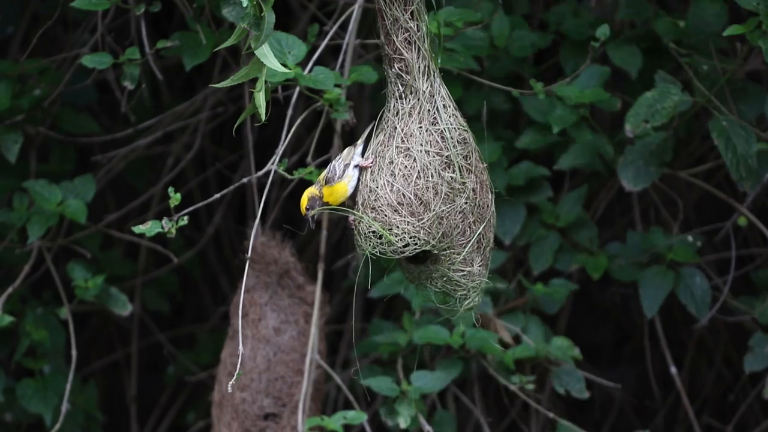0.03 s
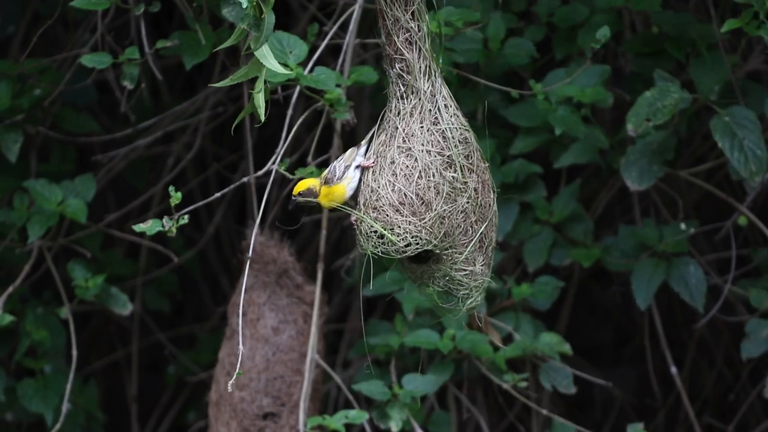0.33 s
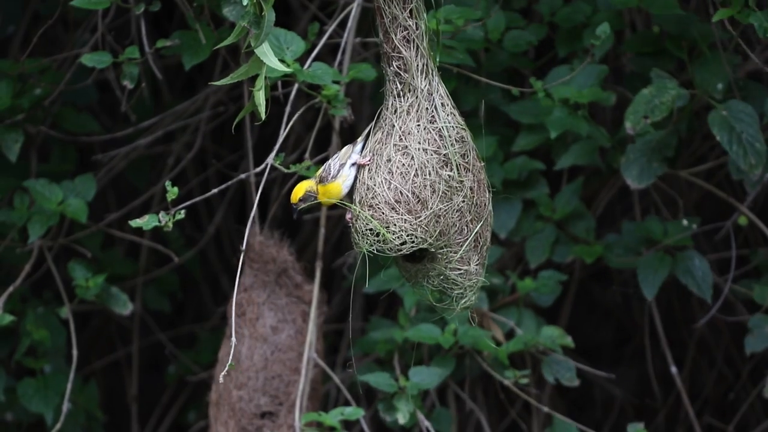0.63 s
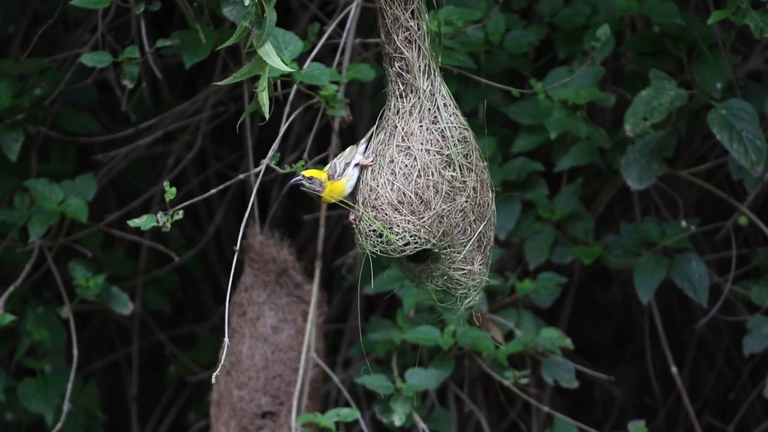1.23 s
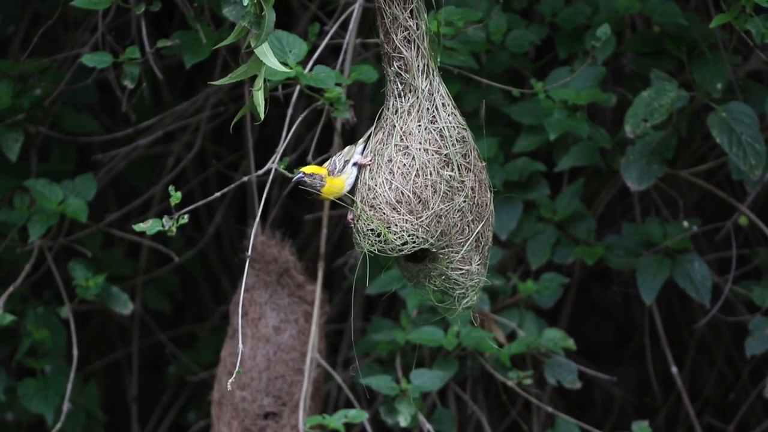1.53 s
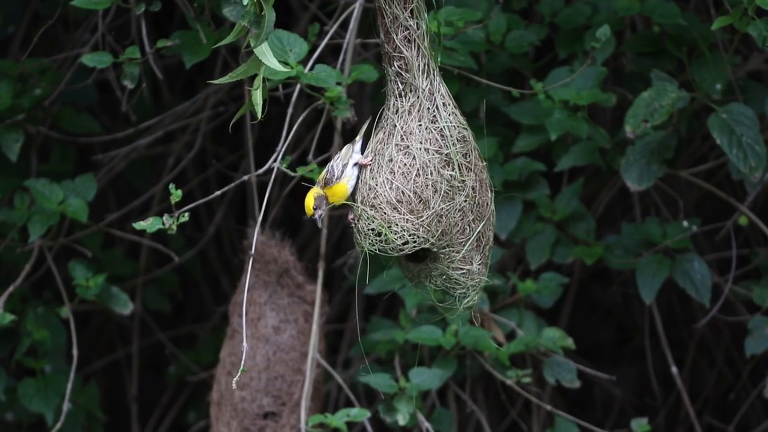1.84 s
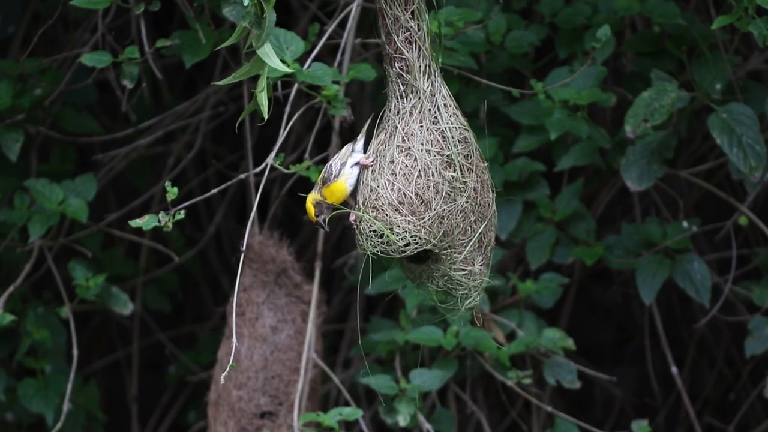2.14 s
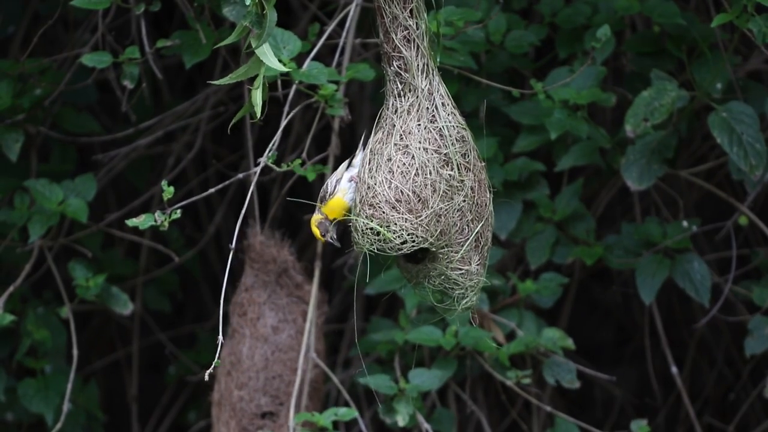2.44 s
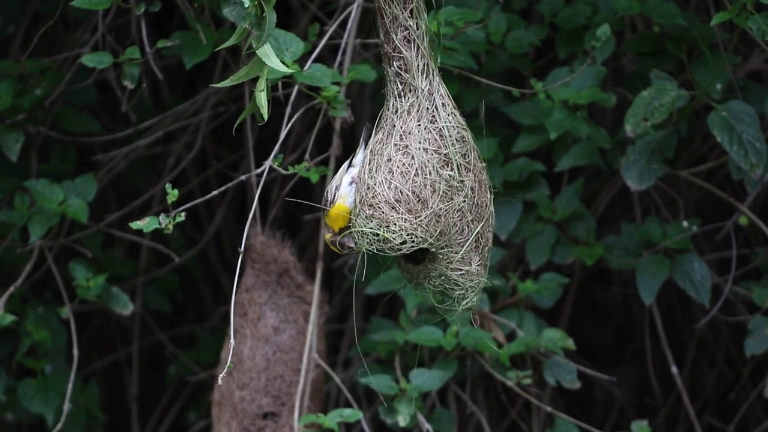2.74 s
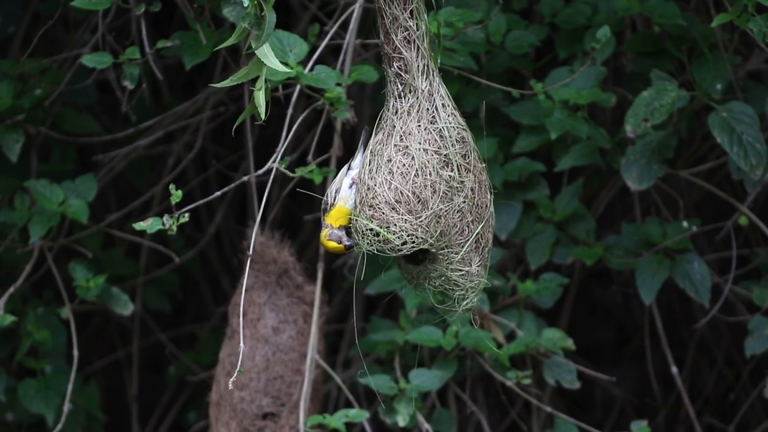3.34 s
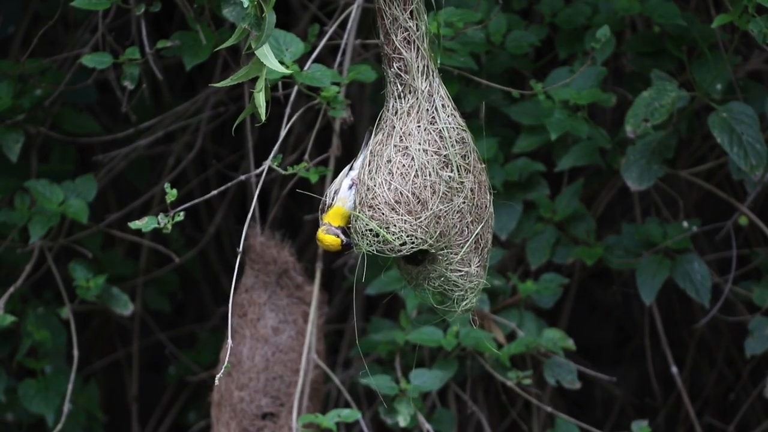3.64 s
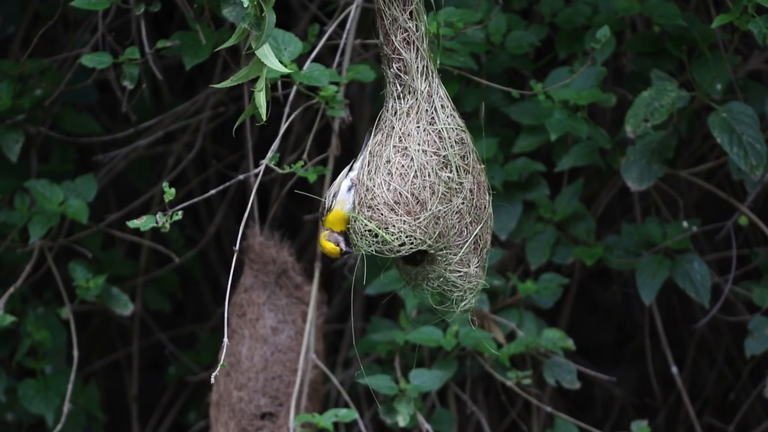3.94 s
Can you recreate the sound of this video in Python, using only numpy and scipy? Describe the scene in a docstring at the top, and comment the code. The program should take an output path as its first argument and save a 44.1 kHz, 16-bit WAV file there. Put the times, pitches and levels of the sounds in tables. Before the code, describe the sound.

Small birds chirp and chatter in short calls over faint hiss and light wind.

```python
"""Weaver birds at a nesting colony in dense shrubs, in mono, over a steady outdoor hiss.
First one bird runs off rough chirps, two-voiced from its syrinx, while a gust buffets the microphone.
Others add falling slurs, thin whistles, then buzzes and rasps. Midway the chirps end and three sharp
clacks ring. A farther bird then gives four zigzag calls, the last in a second gust.
Foliage scatters every call."""
import sys
import numpy as np
from scipy import signal
from scipy.fft import rfft, irfft
from scipy.io import wavfile

SR = 44100
rng = np.random.default_rng(int(sys.argv[2]) if len(sys.argv) > 2 else 0)


def master(y):
    """Save y as 16-bit WAV."""
    cut = np.clip(np.atleast_2d(y).T, -1, 1)
    pcm = np.round(cut * 32767)  # scale
    wavfile.write(sys.argv[1], SR, pcm.astype(np.int16))


N = 176400
TIME = np.arange(N) / SR

# outdoor hiss spectrum: freq_hz, gain_db
AIR_SPECTRUM = [(20, -18), (60, -5), (120, -0.5), (200, -0.5), (330, -3), (480, -3), (680, -7),
                (1200, -8.5), (2700, -10), (4000, -13.5), (5500, -15.5), (8500, -14.5), (12500, -22.5),
                (16000, -36)]
# outdoor hiss envelope: time_s, level_db
AIR_ENVELOPE = [(.04, -35), (1, -37), (1.7, -37), (2.5, -36), (3.1, -36.5), (3.45, -36.5), (4, -38)]
# envelope of its treble: time_s, gain_db
TREBLE_ENVELOPE = [(.04, 0), (.22, -1), (.9, 1.5), (1.35, 3), (1.55, -1), (1.75, -2), (2.05, 2),
                   (2.2, -1.5), (2.55, 1.5), (2.85, -0.5), (3.3, 0), (3.5, -4.5), (3.7, -0.5), (4, -1)]
# wind rumble spectrum: freq_hz, gain_db
WIND_SPECTRUM = [(20, -18), (50, -3.5), (100, -2), (200, -7), (400, -14), (1200, -39)]
# wind rumble envelope: time_s, level_db
WIND_ENVELOPE = [(0, -54), (.35, -42), (.7, -36), (.92, -45), (1.03, -37.5), (1.35, -52.5), (2.3, -45),
                 (3.35, -55), (3.54, -37.5), (3.7, -43), (3.8, -30.5), (4, -37.5)]
# eddies on the microphone: centre_s, pitch_hz, peak_db
BUFFETS = [(.4, 105, -26.5), (.478, 113, -25), (0.534, 107, -21), (.625, 94, -25), (0.655, 113, -19),
           (0.721, 75.6, -22), (.805, 90, -21), (.828, 148, -28), (3.78, 95, -21), (3.808, 100, -44),
           (3.83, 135, -26), (3.859, 128, -23.5), (3.928, 108, -23), (3.964, 170, -22.5),
           (3.981, 107, -22.5)]
# reflections off near branches: delay_s, gain_db
TWIG_ECHOES = [(.007, -18.5), (.013, -19.5), (.022, -22.5)]
# twig and bill ticks: start_s, level_db
TICKS = [(0.189, -18), (.256, -17), (.761, -32), (.776, -19), (1.155, -22), (1.574, -35), (1.841, -24),
         (2.8, -17), (3.641, -23)]
# woody knocks: start_s, level_db
CLACKS = [(1.858, -13), (1.8731, -14), (1.909, -11)]
# resonances of a knock: freq_hz, gain_db, t60_s
CLACK_MODES = [(1180, -6, 0.0027), (1500, -1, 0.013), (1690, -3, 0.0053), (2420, -1, 0.0053),
               (5130, 1.5, 0.0017)]
# rasps: start_s, length_s, centre_hz, width_hz, level_db
RASPS = [(1.153, 0.064, 6250, 1300, -40.5), (1.201, 0.0088, 2190, 500, -32.5),
         (1.84, 0.075, 7160, 2200, -38), (1.919, 0.099, 4000, 1700, -32.5), (1.93, 0.072, 1455, 260, -37),
         (2.141, 0.081, 2200, 900, -43), (2.438, 0.095, 5700, 1600, -45), (2.472, 0.13, 3050, 900, -42),
         (2.748, 0.09, 7100, 2970, -39), (2.843, 0.029, 4100, 800, -37), (2.85, 0.018, 1140, 300, -37.5),
         (3.112, 0.042, 7500, 4500, -43.5), (3.531, 0.083, 1670, 1100, -47.5),
         (3.574, 0.054, 8300, 2200, -46), (3.68, 0.066, 7200, 3720, -41)]
# buzzy trills: start_s, length_s, centre_hz, sweep_hz, sweeps_per_s, level_db
BUZZES = [(1.029, 0.062, 2012, 630, 130, -33.5), (2.409, 0.051, 3320, 1460, 110, -30),
          (3.486, 0.042, 2150, 900, 110, -45), (3.581, 0.038, 2450, 700, 113, -40)]
# whistles: start_s, length_s, first_hz, last_hz, level_db
WHISTLES = [(0.224, 0.01, 3250, 3160, -35), (0.649, 0.037, 1930, 1845, -42.5),
            (.903, 0.024, 2950, 2780, -38), (0.923, 0.039, 2777, 2752, -33.5),
            (1.115, .04, 2880, 2760, -39), (2.199, 0.023, 2950, 2850, -43), (2.224, 0.069, 2480, 2210, -40),
            (2.979, 0.054, 2760, 2742, -36), (3.556, 0.041, 1760, 1695, -45)]
# falling slurs: start_s, length_s, top_hz, end_hz, level_db
SLURS = [(0.092, 0.039, 4240, 3550, -38.5), (0.294, 0.033, 3000, 1930, -38),
         (0.475, 0.013, 4250, 3680, -29), (0.557, .018, 3140, 2330, -38), (0.64, 0.04, 3930, 3050, -37.5),
         (0.682, 0.048, 2550, 1930, -41.5), (0.808, .016, 3900, 3000, -34),
         (0.971, .042, 2800, 1823, -33.5), (1.282, 0.059, 2980, 1723, -36.5),
         (1.673, 0.051, 3045, 1680, -36), (1.938, .062, 3950, 2913, -29),
         (1.962, 0.0274, 2754, 2090, -31.5), (2.536, 0.0253, 2540, 1890, -37),
         (2.832, .054, 3250, 1927, -34), (2.93, 0.015, 4500, 3700, -39.5),
         (2.941, 0.043, 3360, 2860, -38.5), (3.027, 0.025, 2896, 2300, -38)]
# zigzag calls: start_s, pitch_ratio, level_db
ZIGZAGS = [(2.291, 1.0, -34.5), (2.816, 1.01, -35.5), (3.27, 0.97, -33.5), (3.844, 1.01, -31)]
# contour of one zigzag: time_s, pitch_hz, gain_db, roughness
ZIGZAG_CONTOUR = [(0, 4640, 1, 0.06), (.005, 5896, -2, 0.1), (.011, 5014, -4, 0.06),
                  (.016, 3915, -3.5, 0.18), (.025, 4186, 1.5, 0.25), (.03, 5150, -5, 0.17),
                  (.036, 4802, -10, 1.02), (.046, 3950, -2, 1), (.058, 4300, -7.5, 1)]
# chatter chirps: start_s, length_s, level_db, hiss_gain_db, roughness, pitch_ratio
CHIRPS = [(0.046, 0.082, -38, 2, 0.97, 1.13), (0.24, 0.066, -25, -8, 0.52, 1.03),
          (0.404, .08, -29, -6.5, 0.53, 1.05), (0.561, 0.077, -30.5, -7, 0.7, 1.02),
          (0.745, 0.093, -32.5, 1, 0.88, 0.96), (.893, 0.091, -32.5, -3.5, .7, 0.94),
          (1.05, 0.09, -32, -5.5, 0.5, 0.98), (1.231, 0.075, -31, -5, 0.7, .99),
          (1.416, .084, -37, -0.5, 0.44, .98), (1.59, 0.085, -36, -8.5, 0.36, .98),
          (1.773, 0.096, -39, -2, 0.34, 0.94)]
# the two sides of the syrinx in a chirp: length_share, pitch_hz, gain_db
LEADING_VOICE = [(0, 4400, -6), (.06, 4850, -3.5), (.13, 4700, -3.5), (.22, 3950, -4.5), (.42, 3300, -3),
                 (.65, 2850, -7.5), (1, 2650, -5)]
TRAILING_VOICE = [(0.152, 4400, 1), (0.212, 5050, -7), (0.278, 4700, -4.5), (.48, 4600, 0), (.68, 4100, -2),
                  (.88, 3880, -4.5), (1, 3300, 0.5)]
# chirp hiss spectrum: freq_hz, gain_db
CHIRP_HISS_SPECTRUM = [(1500, -47), (2700, 5.5), (4600, -4), (5500, -4.5), (6400, 2), (8200, 0),
                       (10000, -11.5), (12500, -11), (16000, -43)]


def from_db(db):
    """Decibels to gain."""
    return 10 ** (np.asarray(db) / 20)


def rms_one(x):
    """Scale to unit rms."""
    return x / np.sqrt(np.mean(x ** 2) + 1e-20)


def add(out, start_s, x):
    """Mix x in at start_s."""
    i = max(int(start_s * SR), 0)
    out[i:i + len(x)] += x[:max(N - i, 0)]


def envelope(points):
    """Gain over the scene from (time_s, db) points."""
    return from_db(np.interp(TIME, *np.transpose(points)))


def phase_rad(hz):
    """Running phase of a varying frequency."""
    return 2 * np.pi * np.cumsum(hz) / SR


def noise(spectrum):
    """Unit-rms noise shaped by (freq_hz, gain_db) points."""
    hz, db = np.transpose(spectrum)
    bins_hz = np.arange(N // 2 + 1) * SR / N
    gain = from_db(np.interp(np.log(bins_hz + 1), np.log(hz), db))
    return rms_one(irfft(rfft(rng.standard_normal(N)) * gain, N))


def wobble(rate_hz):
    """Unit-rms random motion up to rate_hz."""
    return rms_one(signal.sosfilt(signal.butter(2, rate_hz, fs=SR, output="sos"), rng.standard_normal(N)))


def progress(length_s):
    """Ramp u, 0 to 1 over a note."""
    return np.linspace(0, 1, max(int(length_s * SR), 16))


def swell(u, edge_share):
    """Rounded rise and fall at a note's edges."""
    return np.sin(np.pi / 2 * np.clip(np.minimum(u, 1 - u) / edge_share, 0, 1))


def contour(shape, at):
    """Pitch in Hz and gain along a call."""
    knots, hz, db = np.transpose(shape)[:3]
    u = (at - knots[0]) / (knots[-1] - knots[0])
    return np.interp(at, knots, hz), from_db(np.interp(at, knots, db)) * swell(u, 0.047)


def air(flicker_db=1.46, flicker_hz=20.3, hum_hz=331.1, wander_hz=4.12, hum_db=-53):
    """Distant outdoor murmur, flickering hiss of leaves and insects, faint wavering hum."""
    bed = envelope(AIR_ENVELOPE) * noise(AIR_SPECTRUM)
    murmur = signal.sosfiltfilt(signal.butter(2, 4000, fs=SR, output="sos"), bed)
    treble_gain = envelope(TREBLE_ENVELOPE) * from_db(flicker_db * wobble(flicker_hz))
    hum = from_db(hum_db) * np.sqrt(2) * np.sin(phase_rad(hum_hz + wander_hz * wobble(8.1)))
    return murmur + (bed - murmur) * treble_gain + hum


def wind(sigma_s=0.0061):
    """Low rumble; single eddies thump the microphone for a cycle or two."""
    out = envelope(WIND_ENVELOPE) * noise(WIND_SPECTRUM)
    t = TIME[:SR // 10] - TIME[SR // 20]
    pulse = np.exp(-.5 * (t / sigma_s) ** 2)
    for centre_s, hz, db in BUFFETS:
        add(out, centre_s + t[0], from_db(db) * pulse * np.sin(2 * np.pi * (hz * t + rng.random())))
    return out


def foliage(x, wet_db, t60_s=0.66, onset_s=0.002):
    """Direct sound plus the thicket's diffuse tail."""
    t = TIME[:SR]
    decay = from_db(-60 * t / t60_s) * np.clip(t / onset_s, 0, 1)
    tail = rng.standard_normal(SR) * decay / np.sqrt(np.sum(decay ** 2))
    return x + from_db(wet_db) * signal.fftconvolve(x, tail)[:N]


def twig_echoes(x):
    """Short reflections off near branches; power unchanged."""
    out = x.copy()
    for delay_s, db in TWIG_ECHOES:
        add(out, delay_s * rng.uniform(.9, 1.1), from_db(db) * x)
    return out * np.std(x) / np.std(out)


def ticks(decay_s=0.003, band_hz=(5500, 10900)):
    """Tiny bright snaps of twigs and bills."""
    out, t = np.zeros(N), TIME[:SR // 100]
    for start_s, db in TICKS:
        add(out, start_s, from_db(db) * np.exp(-t / decay_s) * rng.standard_normal(len(t)) / 2)
    return signal.sosfilt(signal.butter(2, band_hz, "band", fs=SR, output="sos"), out)


def clacks(spread_db=1.9):
    """Woody knocks: damped modes ring for milliseconds."""
    out, t = np.zeros(N), TIME[:SR // 10]
    for start_s, db in CLACKS:
        for k, (hz, mode_db, t60_s) in enumerate(CLACK_MODES):
            decay = from_db(db + mode_db + rng.normal(0, spread_db) - 60 * t / t60_s)
            add(out, start_s, (-1) ** k * decay * np.sin(2 * np.pi * hz * t))
    return out


def syrinx(hz, roughness, octave_db, jitter=0.078, shimmer=0.9, tremor_hz=550):
    """Bird voice: sine plus weak octave; roughness shakes pitch and strength."""
    fm, am = wobble(tremor_hz).reshape(2, -1)[:, :len(hz)]
    phase = phase_rad(hz * (1 + jitter * roughness * fm))
    tone = np.sin(phase) + from_db(octave_db) * np.sin(2 * phase)
    return np.sqrt(2) * (1 + shimmer * roughness * am) * tone


def rasps(puffs_per_s=125, puff_depth=0.23):
    """Uneven puffs of noise through one throat resonance."""
    out = np.zeros(N)
    for start_s, length_s, centre_hz, width_hz, db in RASPS:
        u = progress(length_s)
        rate_hz = puffs_per_s * (1 + 0.14 * wobble(90)[:len(u)])
        puffs = (1 + puff_depth * np.sin(phase_rad(rate_hz))) * rng.standard_normal(N)[:len(u)]
        band_hz = [centre_hz - width_hz / 2, centre_hz + width_hz / 2]
        throat = signal.butter(2, band_hz, "band", fs=SR, output="sos")
        add(out, start_s, from_db(db) * swell(u, 0.05) * rms_one(signal.sosfilt(throat, puffs)))
    return out


def buzzes(unevenness=.35, pulse_depth=0.46, fade_db=2):
    """Rough tone swept rapidly up and down, strongest on each fall."""
    out = np.zeros(N)
    for start_s, length_s, centre_hz, sweep_hz, sweeps_per_s, db in BUZZES:
        u = progress(length_s)
        sweep_rad = phase_rad(sweeps_per_s * (1 + unevenness * wobble(148)[:len(u)]))
        hz = centre_hz + sweep_hz / 2 * np.cos(sweep_rad)
        tone = syrinx(hz, roughness=0.557, octave_db=-11, jitter=0.124)
        gain = from_db(-fade_db * u) * (1 + pulse_depth * np.sin(sweep_rad))
        add(out, start_s, from_db(db) * swell(u, .15) * rms_one(tone * gain))
    return out


def whistles(settle_power=1.83):
    """Thin notes easing onto a steady pitch."""
    out = np.zeros(N)
    for start_s, length_s, first_hz, last_hz, db in WHISTLES:
        u = progress(length_s)
        hz = last_hz + (first_hz - last_hz) * (1 - u) ** settle_power
        add(out, start_s, from_db(db) * swell(u, 0.1) * syrinx(hz, roughness=0.17, octave_db=-14))
    return out


def slurs(bend_power=1.6):
    """Clear notes that hold their top, then drop ever faster."""
    out = np.zeros(N)
    for start_s, length_s, top_hz, end_hz, db in SLURS:
        u = progress(length_s)
        hz = top_hz + (end_hz - top_hz) * u ** bend_power
        add(out, start_s, from_db(db) * swell(u, 0.17) * syrinx(hz, roughness=.22, octave_db=-16.5))
    return out


def zigzags():
    """A farther bird repeats a quick up-down-up call that ends hoarse."""
    out = np.zeros(N)
    knots_s, _, _, knot_roughness = np.transpose(ZIGZAG_CONTOUR)
    t = TIME[:int(knots_s[-1] * SR)]
    hz, gain = contour(ZIGZAG_CONTOUR, t)
    roughness = np.interp(t, knots_s, knot_roughness)
    for start_s, ratio, db in ZIGZAGS:
        tone = syrinx(ratio * hz, roughness, octave_db=-13.5, jitter=0.138, tremor_hz=400)
        add(out, start_s, from_db(db) * gain * tone)
    return out


def chatter(hiss_attack_s=0.008, hiss_hold_share=0.24, hiss_release_s=0.066):
    """Chirps of two staggered, arched, falling voices, each chirp opened by a burst of hiss."""
    voices, hiss_gain = np.zeros(N), np.zeros(N)
    for shape in (LEADING_VOICE, TRAILING_VOICE):
        for start_s, length_s, db, _, roughness, ratio in CHIRPS:
            hz, gain = contour(shape, progress(length_s))
            tone = syrinx(ratio * hz, roughness, octave_db=-22, jitter=0.071, shimmer=0.71)
            add(voices, start_s, from_db(db) * gain * tone / np.sqrt(2))
    t = TIME[:SR // 4]
    attack = np.minimum(t / hiss_attack_s, 1)
    for start_s, length_s, db, hiss_db, _, _ in CHIRPS:
        release = np.exp(-np.maximum(t - hiss_hold_share * length_s, 0) / hiss_release_s)
        add(hiss_gain, start_s, from_db(db + hiss_db) * attack * release)
    return voices + hiss_gain * noise(CHIRP_HISS_SPECTRUM)


def scene():
    """Birds and knocks in the thicket, with wind and air; both channels alike."""
    birds = foliage(twig_echoes(chatter()), wet_db=-4)
    birds += foliage(slurs() + whistles(), wet_db=-3)
    birds += foliage(twig_echoes(zigzags()), wet_db=-1)
    birds += foliage(rasps() + buzzes(), wet_db=-3.5)
    knocks = foliage(clacks(), wet_db=2, t60_s=0.72)
    return np.tile(birds + knocks + ticks() + wind() + air(), (2, 1))


def record(dry):
    """Brief opening silence, steep low-pass."""
    start_s, cutoff_hz = .036, 15800
    lowpass = signal.ellip(10, .1, 70, cutoff_hz, fs=SR, output="sos")
    return signal.sosfilt(lowpass, dry * (TIME >= start_s))


dry = scene()
out = record(dry)
master(out)
```